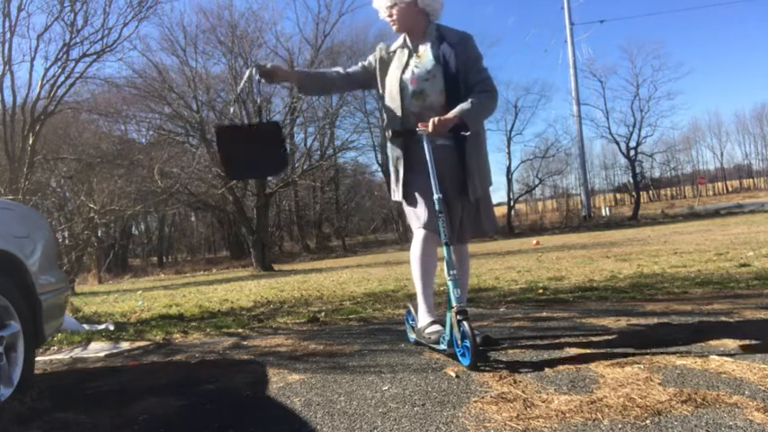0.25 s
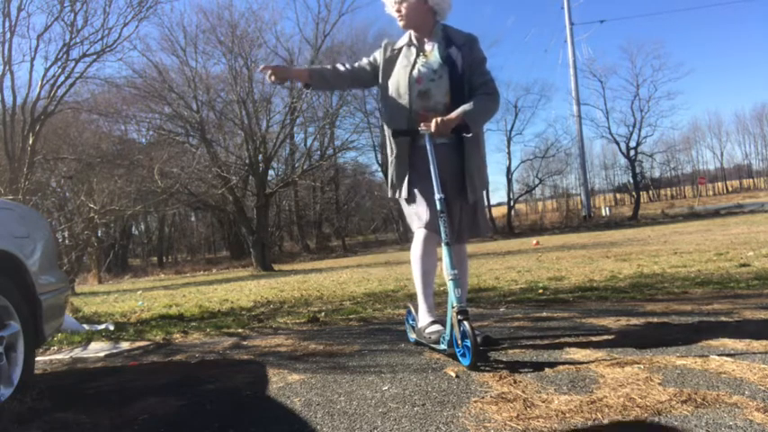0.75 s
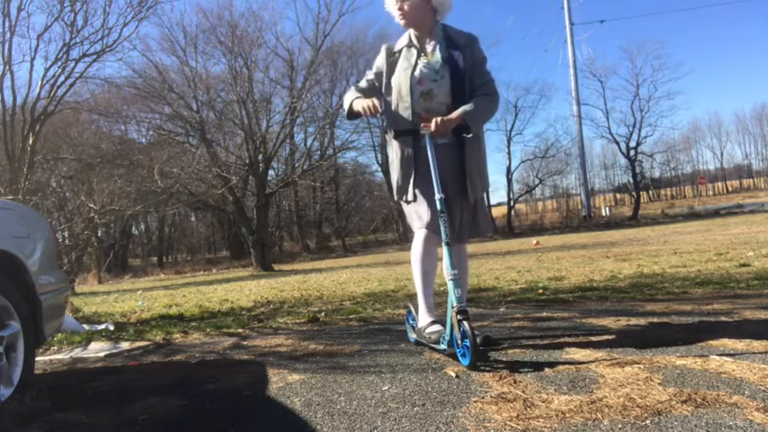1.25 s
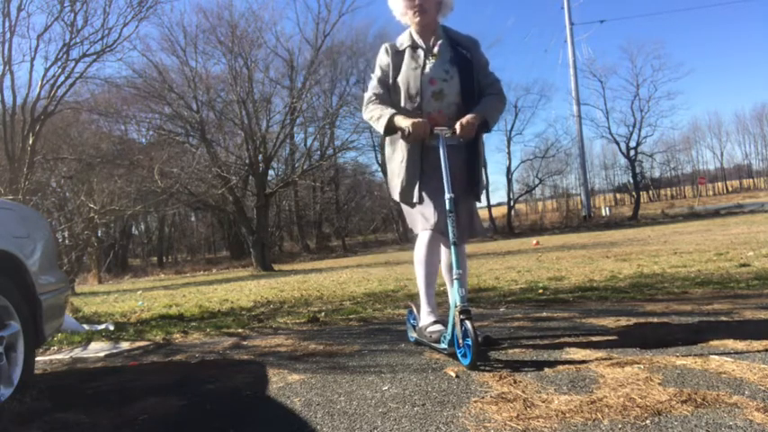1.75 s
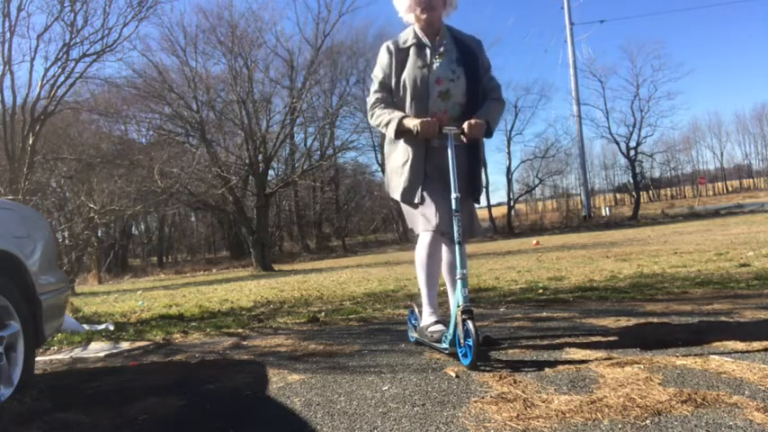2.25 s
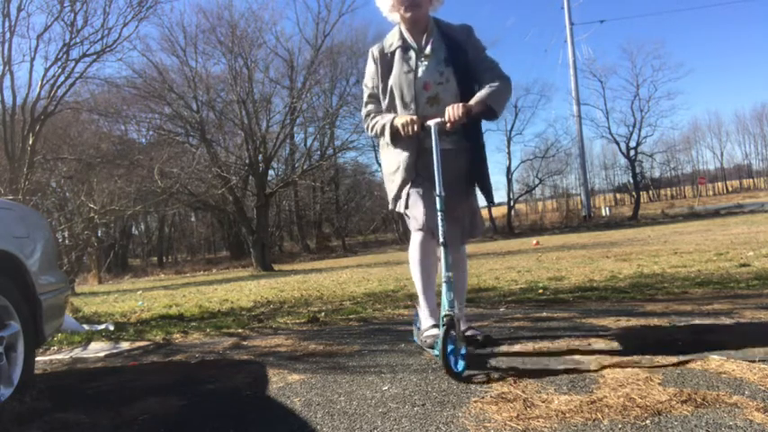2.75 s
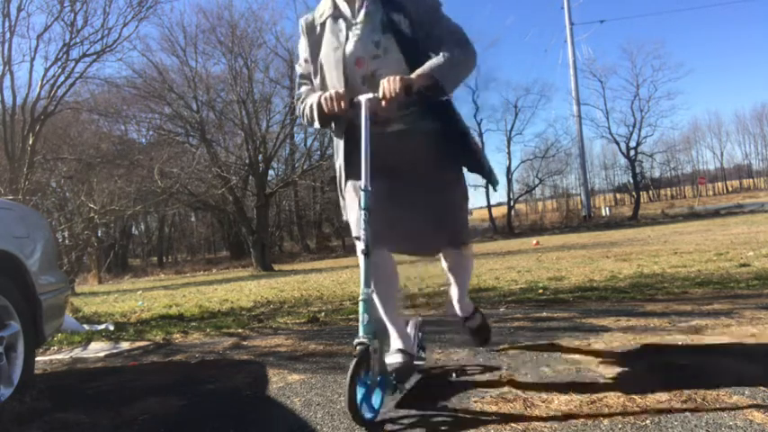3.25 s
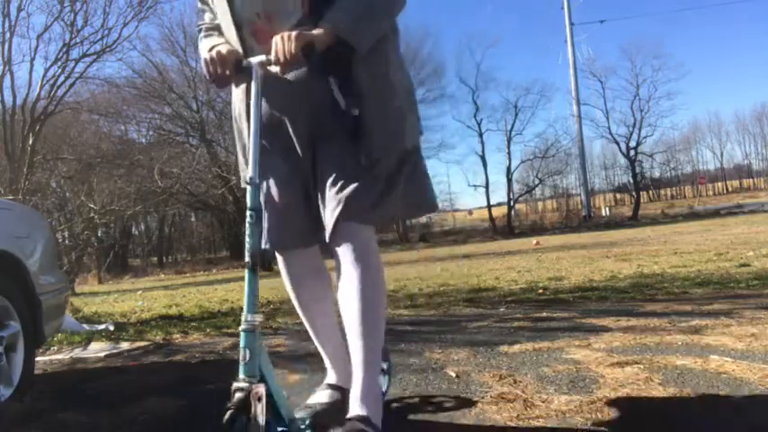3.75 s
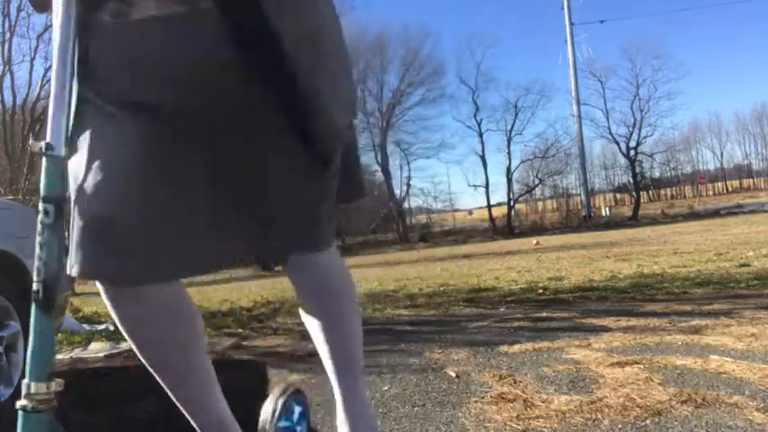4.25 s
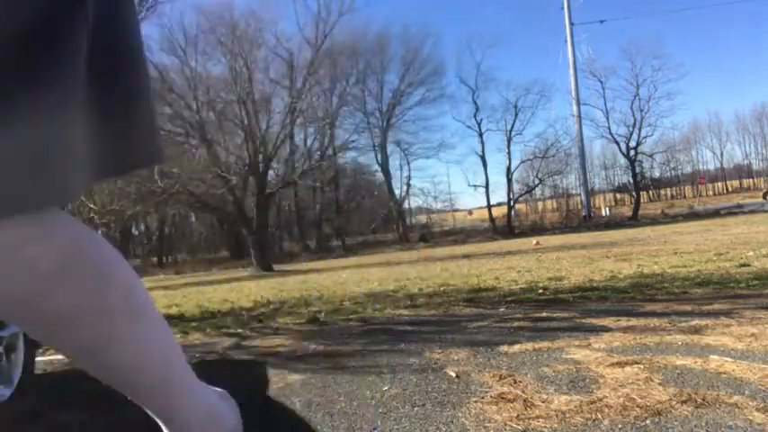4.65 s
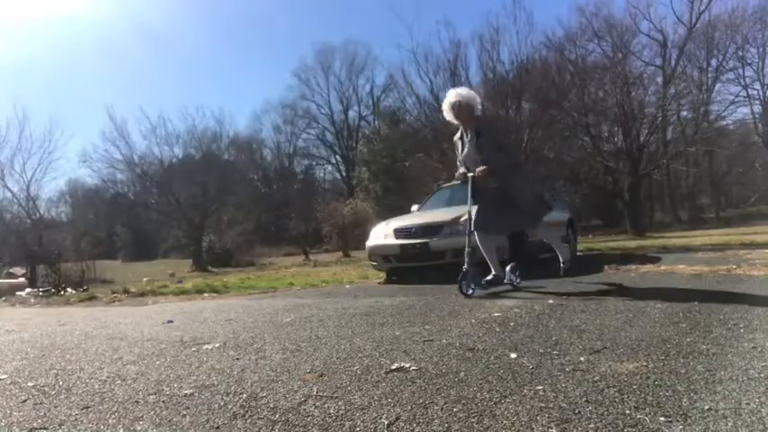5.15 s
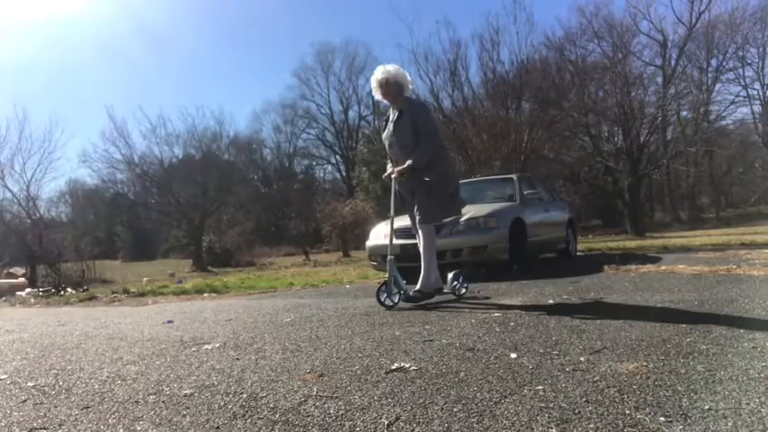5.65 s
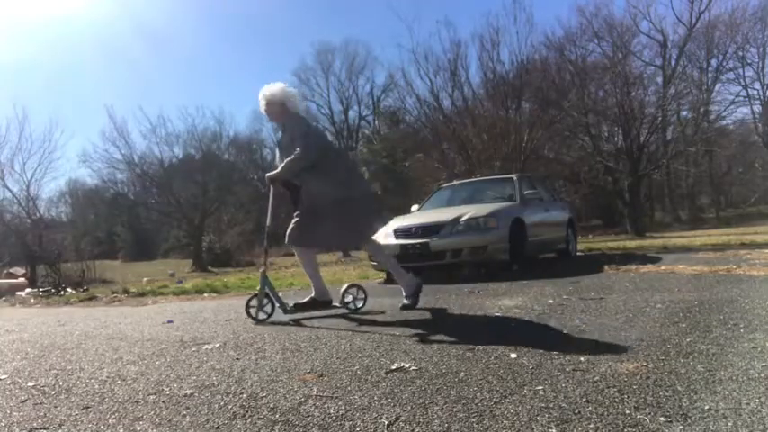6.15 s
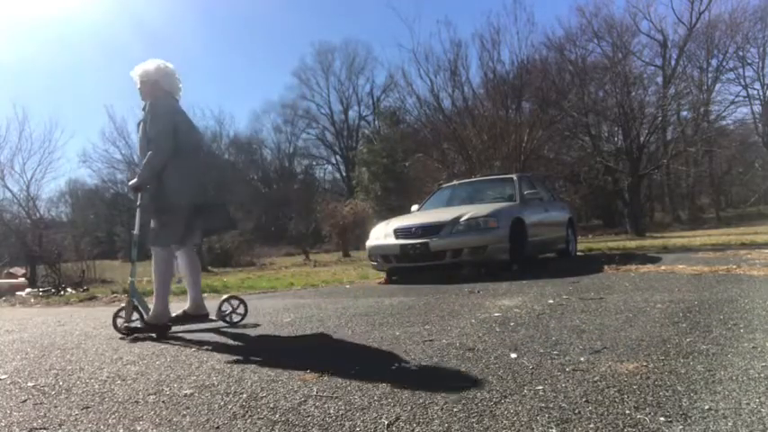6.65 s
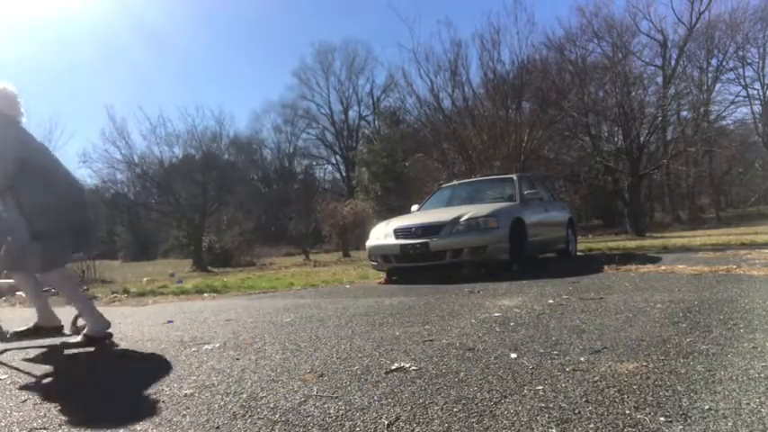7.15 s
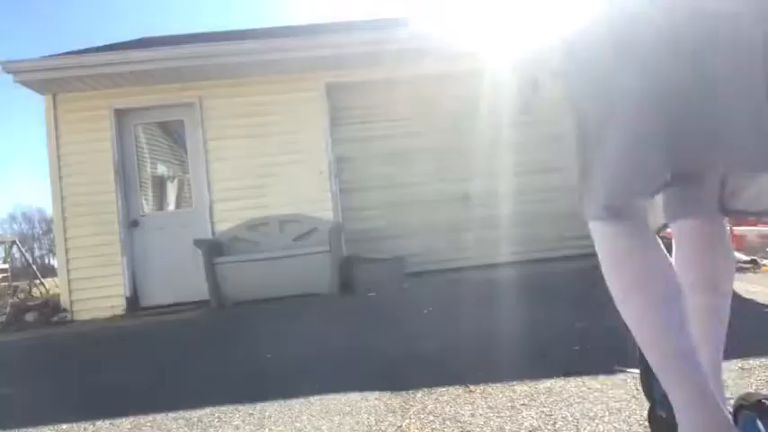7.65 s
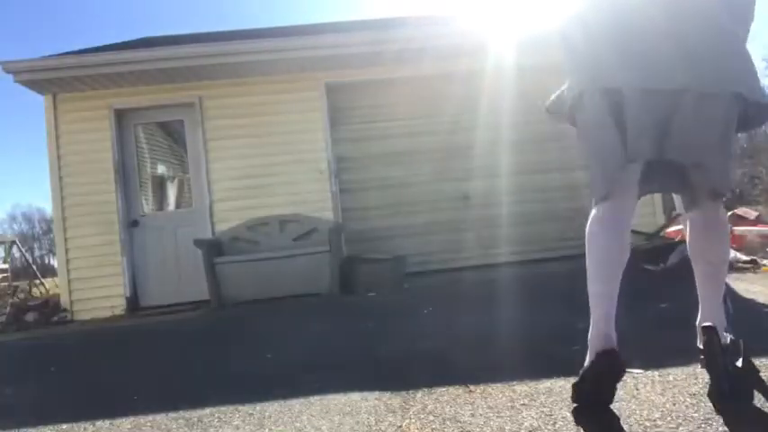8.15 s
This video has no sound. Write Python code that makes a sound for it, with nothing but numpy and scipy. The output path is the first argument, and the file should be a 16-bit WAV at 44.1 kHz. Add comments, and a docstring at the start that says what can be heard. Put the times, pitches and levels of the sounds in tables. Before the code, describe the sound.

A quiet open place with low distant rumble and slight microphone hiss. A soft double thump comes first, then small hard wheels drum over rough asphalt, loose metal parts jolting irregularly. The rattle swells in a close pass, drops suddenly, continues more thinly, and builds again under low wind thumps. A sharp close footstep cracks on grit, then gritty scuffing and rolling fade into gusts.

```python
"""A kick scooter rolls over rough asphalt: grit drums the wheels, jolts rattle loose metal frame parts.
Before it a bag lands twice on a drive; shoes knock, scuff and, from 7.6 s on, strike grit.
Rolling is coloured random clicks, metal is struck damped modes, soft landings are noise bursts.
Wind gusts buffet the microphone over a far rumble, both shaped noise.
The level dips briefly twice; from the first dip on it stays 3 dB lower."""
import sys
import numpy as np
from scipy import signal
from scipy.fft import rfft, irfft
from scipy.io import wavfile
from scipy.ndimage import uniform_filter1d

SR = 44100
rng = np.random.default_rng(int(sys.argv[2]) if len(sys.argv) > 2 else 0)


def transcribe(u):
    """Save the signal u as a 16-bit wav file named by the first command-line argument.

    u: samples, shape (n,) or (channels, n), limited to [-1, 1]; the rate is SR.
    q: integer samples, one column per channel.
    """
    v = np.clip(np.atleast_2d(u).T, -1, 1)
    q = np.round(v * 32767).astype(np.int16)
    wavfile.write(sys.argv[1], SR, q)


N = 370881

# wheels on asphalt, before trims in rolling(): time_s, drum_db, grit_hiss_db
ROLL = [(2.55, -82, -94), (2.68, -73, -80), (3.0, -63, -77), (3.4, -75, -82), (4.03, -69.5, -80),
        (4.3, -54, -60.5), (4.45, -49.5, -65), (4.6, -97, -80), (4.83, -59.5, -74), (5.8, -66.5, -78.5),
        (5.98, -53, -60.5), (6.15, -61, -75.5), (6.9, -59.5, -75.5), (7.45, -56.5, -65.5),
        (7.61, -59, -67.5), (7.72, -40.5, -64), (7.87, -57, -67.5), (8.0, -55.5, -58), (8.18, -57.5, -72.5),
        (8.41, -54, -59.5)]
# spectra of wheel drumming and grit hiss: freq_hz, density_db (per Hz, relative)
DRUM_COLOUR = [(210, -43), (350, 8), (432, 5), (546, -6.5), (675, 2), (881, -2), (1820, 5), (2830, -12.5),
               (3170, -7.5), (5000, -19.5), (6500, -11), (11000, -120)]
GRIT_COLOUR = [(2350, -7.5), (4000, 2.5), (4580, -7.5), (6860, -6), (10300, -16), (11500, -8), (15100, -11),
               (16000, -8), (16500, -29)]
HUM_DB = -17   # metal hum against the drumming

# jolts of the frame; from 7.6 s on, shoes striking grit, with hardly any metal ring:
# start_s, level_db, stem_over_deck_db, crack_over_level_db
JOLTS = [(2.6225, -46, 7, -5), (2.6668, -44, -2, -17), (2.6957, -31.5, 8, -19), (2.7584, -44, 17, -27),
         (2.7793, -38, 1, -19), (2.808, -38, 8, -22), (2.9404, -46, -3, -14), (2.9703, -44.5, 4, -4.5),
         (2.9987, -33.5, 13, -18), (3.035, -40.5, -9, -20), (3.1021, -35, 8.5, 8.5),
         (3.1596, -34, 10.5, -32), (3.207, -40, 8, -28), (3.3879, -37.5, 10, -40), (3.4874, -47, -14, -12),
         (3.5257, -45, 5.5, -40), (3.5749, -41.5, 7.5, -55), (3.6596, -37, 7, -49), (3.6952, -42, 6, -34),
         (3.736, -55.5, -12, 11), (3.8468, -49, 1, -3.5), (3.9544, -37, 2.5, -32), (4.0835, -40, 5.5, -41),
         (4.1835, -43.5, -2, -33), (4.2355, -42, 6, -27), (4.261, -37.5, 5, -9), (4.2804, -36.5, -16, -6),
         (4.3109, -32.5, 3, -10.5), (4.338, -29.5, 6, -35), (4.3733, -35, 2, -50), (4.4147, -34, -19, -32),
         (4.437, -31, -2, -46), (4.4606, -35.5, 1, -13), (4.496, -31.5, 5, -36), (4.5332, -23, 11.5, -36),
         (4.5567, -27.5, -20, -15), (4.573, -32.5, 14, -41), (4.6052, -25, 7, -29), (4.743, -54, 10, -3),
         (4.7754, -54, 6, 0), (4.8666, -41.5, 22, -28), (4.9491, -43, -3, -5), (4.9965, -33.5, 8, -15),
         (5.0187, -36.5, -6, -16), (5.044, -37.5, 9, -24), (5.0914, -51.5, -2, 3), (5.1072, -41, 13, -11),
         (5.2504, -50, 15, -3), (5.2845, -42.5, 8, -20), (5.3113, -42.5, -15, -15), (5.346, -35.5, 8, -17),
         (5.3829, -41.5, 2, -5.5), (5.576, -36.5, 4.5, -14.5), (5.6119, -38, -2.5, -28),
         (5.6524, -33.5, -2.5, -24), (5.7012, -31, 9, -16), (5.7325, -30.5, 11.5, -16),
         (5.763, -37.5, 3.5, -31), (5.8678, -41.5, -19, -27), (5.8833, -46, 10, -3), (5.902, -35, 3, -15),
         (5.923, -31, 7, -27), (5.9429, -31, 7, -21), (5.9762, -37, 6, -16), (5.9983, -34.5, 5, -23),
         (6.0226, -42.5, -1, -21), (6.099, -37, -32, -33), (6.1392, -40.5, -0.5, -25),
         (6.2077, -37, 2, -26), (6.2537, -39.5, 8, -22), (6.2812, -41, 1, -23), (6.345, -54, 3, -20),
         (6.377, -44, 8, -19), (6.4018, -43, -1, -15), (6.4286, -41, 2, -18), (6.5469, -31, 7, -22),
         (6.5817, -37.5, 2, -14), (6.6086, -32.5, 10, -13), (6.656, -40, 12, -26), (6.717, -47.5, 4, -24),
         (6.7438, -49, 0, -22), (6.8111, -33.5, 14, -32), (6.8498, -37, 11, -22), (6.874, -37.5, 25, -27),
         (6.8934, -42, 23, -21), (6.998, -40, -5, -26), (7.027, -30, 5, -6.5), (7.0644, -30, -10, -22),
         (7.102, -34.5, -24, -22), (7.148, -38.5, 2, -20), (7.2602, -35.5, -27, -19),
         (7.303, -32.5, 19, -26), (7.3623, -32.5, 18, -27), (7.395, -35.5, 9, -7), (7.4287, -30, 9, -20),
         (7.459, -28.5, 9, -35), (7.5117, -29, 27, -30), (7.5948, -36, 23, -20), (7.681, -38, -8, -22),
         (7.69, -30, 1, -8), (7.7002, -11, 2, -15), (7.762, -20.5, 23, -16), (7.7891, -25.5, 23, -19),
         (7.837, -36, -4, -24), (7.863, -34, 1.5, -11), (7.9196, -35.5, -25, -14), (7.9454, -35, -16, -1.5),
         (7.965, -29, -6, -10), (8.0195, -36.5, -4, -3), (8.0412, -43, 2, 3.5), (8.099, -49.5, 3, 8),
         (8.149, -39, -29, -27), (8.22, -39, 2, -13), (8.2445, -32.5, -15.5, -16), (8.32, -47, 6, 3),
         (8.3706, -32.5, -30, -16)]
# modes of each frame part: freq_hz, level_db (relative), t60_s
DECK_MODES = [(1156, -2, 0.014), (1380, -25, 0.0044), (1680, -7, 0.022), (1784, 1.5, 0.02),
              (2134, 1.5, 0.045), (2400, 9, 0.0083)]
STEM_MODES = [(2900, -10, .015), (3135, -2, .027), (3510, -9, .02), (3890, -4, .022), (4300, -12, .015)]
SMALL_PART_MODES = [(5450, -8, .012), (5930, -3, .018), (7350, -5, .014), (8010, -7, .012)]
CRACK_MODES = [(9250, -6, .008), (11650, -3, .008)]
PIN_MODES = [(6740, 0, .045)]
PIN_OVERTONE_MODES = [(12150, -21, .025)]
MODE_SPREAD_DB, PART_SPREAD_DB = 3.2, 3   # unevenness over modes; over small parts and pin
SMALL_PARTS_DB, SMALL_PARTS_FOLLOW_CRACK = -1.5, 0.36   # against the mean of stem and jolt level
PIN_DB, PIN_LOOSE_DB = -22, 28   # against the jolt; added while the pin chatters harder
PIN_LOOSE_FROM_S, PIN_LOOSE_TO_S = 6.12, 6.76
FAINT_JOLTS_PER_S, FAINT_JOLT_DB = 17, 12   # random small jolts; highest level over ROLL drum_db
DULL_FROM_S, DULL_RING_DB = 7.6, -14   # shoes on grit: ring held down

THRUM_FROM_S, THRUM_LENGTH_S, THRUM_DB, THRUM_HZ, THRUM_T60_S = 4.12, 0.57, -53.5, 89, 0.12

# grit cracking under wheel or sole, before trims in snaps(): start_s, level_db, body_3_8khz_db (relative)
SNAPS = [(2.9614, -52, -1), (3.0514, -51, 12), (3.113, -40.5, 10), (3.2545, -50, -17), (3.3774, -70, 17),
         (3.746, -37.5, -1), (4.1038, -47, 0), (4.1374, -45, 4), (4.156, -39, -13), (4.299, -37, 4.5),
         (4.8179, -43, -9), (6.156, -33, -11), (6.175, -41, -4), (6.3879, -36, -11), (6.468, -42, 1),
         (6.478, -44, -1), (7.1686, -33, -7), (7.255, -32.5, -13), (7.378, -31, -13), (7.409, -29, -6),
         (7.4654, -28.5, -15), (7.713, -17, 2), (7.9114, -35, -16), (7.985, -27, -16), (8.081, -37, -18.5),
         (8.1728, -38, -10), (8.194, -39, -4), (8.3399, -35, -11), (8.3764, -44, -5)]
# short knocks: bag thud, shoe and heel taps, sharp cracks of the rattling frame:
# start_s, peak_db (before the band-pass), pitch_hz, t60_s
KNOCKS = [(.8345, -32, 630, 0.016), (.857, -36, 110, 0.047), (2.696, -33, 6650, 0.0097),
          (4.4165, -29, 1370, 0.011), (1.0585, -37, 1600, 0.012), (3.0997, -18.5, 7600, 0.0055),
          (3.0983, -33, 10500, 0.0034), (3.369, -42.5, 1250, 0.033), (4.5565, -25, 2100, 0.0057),
          (5.6829, -20, 770, 0.0068), (7.7008, -4, 1660, 0.0037), (7.7647, -11.5, 5260, 0.002),
          (7.748, -21, 1160, .012)]
# bag, shoes, cloth; nominal values, scaled in slaps():
# start_s, level_db, length_s, low_edge_hz, high_edge_hz, bright_edge_db (over the body)
SLAPS = [(.832, -29.5, 0.017, 340, 830, -24), (.833, -40.5, 0.045, 1220, 2640, -36),
         (0.836, -29.5, 0.071, 59.4, 250, -22.5), (0.99, -57.5, 0.033, 400, 2940, -30),
         (1.058, -31.5, 0.081, 272, 970, -45), (1.0554, -34, 0.057, 1030, 2270, -23.5),
         (1.482, -68, .06, 3000, 15000, -30), (1.62, -66.5, 0.25, 3000, 15000, -30),
         (3.751, -41, 0.032, 665, 1940, -28), (2.998, -52, 0.15, 2180, 4700, -27),
         (5.867, -47.5, 0.32, 990, 3870, -15), (7.04, -38, 0.21, 930, 3600, -16.5),
         (7.702, -20.5, 0.038, 200, 567, -30), (7.705, -26, 0.069, 780, 7000, 0)]
SLAP_GRAIN_DB, SLAP_GRAIN_HZ = 3.5, 160   # grit under what lands breaks the burst up

# gusts on the microphone; at 4.256 s low wheel rumble as the scooter passes close:
# peak_start_s (full strength reached), peak_db, hold_s, flutter_over_swing_db
GUSTS = [(.15, -53.5, 0.083, -30), (.6, -55.5, 0.6, -32), (4.256, -59, 0.32, 4.5), (4.94, -51, .02, -12),
         (5.086, -48.5, 0.025, -20), (5.48, -54, .03, -20), (6.573, -35, 0.0074, -16.5),
         (6.634, -34.5, 0.0079, -11.5), (6.697, -42, 0.034, -26), (6.882, -36, 0.031, -30),
         (6.978, -41.5, 0.27, -12.5), (7.275, -31.5, 0.0083, -22), (7.314, -30, 0.0091, -21),
         (7.357, -30.5, .01, -22), (7.427, -38, .04, -15), (7.507, -29, 0.016, -20.5),
         (7.915, -40.5, 0.018, -11), (7.973, -34, 0.0089, -7.5), (8.02, -33, 0.0091, -15),
         (8.124, -36.5, 0.043, -10), (8.216, -37, .01, -8.5), (8.291, -27, 0.014, -17),
         (8.337, -32.5, 0.0081, -18), (8.392, -35, 0.023, -7.5)]
# spectrum of the slow swings: freq_hz, density_db (per Hz, relative)
WIND_COLOUR = [(15, -33), (25, -7), (40, -3), (59, 2.5), (115, -6), (170, -13), (220, -27), (370, -120)]
GUST_RISE_DB_PER_S, GUST_FALL_DB_PER_S = 406, 357
# light air between the gusts
BREEZE_FROM_S, BREEZE_DB, BREEZE_SWAY_DB, BREEZE_FLUTTER_DB = 4.7, -60, 3, -15.5

# far rumble of the open country, before the trim in far(): time_s, level_db, wash_above_600hz_db
FAR = [(0.0, -57, 5), (1.0, -52, 2), (1.9, -54, 0), (4.05, -55.5, -2.5), (4.6, -54.5, 7),
       (4.75, -70.5, 8.5), (6.1, -58.5, 3), (7.0, -68.5, 2.5), (7.6, -54, 4.5), (8.41, -51.5, 2.5)]
# spectrum of the far rumble: freq_hz, density_db (per Hz, relative)
FAR_COLOUR = [(15, -34), (25, 7.5), (65, -1.5), (130, -3), (184, -3.5), (265, -1.5), (319, -8.5),
              (854, -17.5), (1070, -17.5), (1320, -19.5), (2510, -31.5), (6000, -53), (7800, -71),
              (13200, -120)]

# spectrum of the microphone's own hiss: freq_hz, density_db (per Hz, relative)
SELF_NOISE_COLOUR = [(1180, -14), (2000, -5), (5010, -10.5), (5720, -8), (10500, -18), (14600, -15.5),
                     (16500, -31)]
SELF_NOISE_DB = -74
# brief level dips: bottom_s, depth_db (from the level before), fade_out_s, fade_in_s, gain_after_db
DIPS = [(4.655, -22.5, 0.038, 0.034, -3), (7.587, -26, 0.021, 0.0097, -3)]
LOW_CUT_HZ, HIGH_CUT_HZ = 34.0, 16700


def from_db(db):
    """Gain of a level in dB."""
    return 10 ** (np.asarray(db) / 20)


def rms_one(x):
    """Scale to rms 1."""
    return x / np.sqrt(np.mean(x ** 2) + 1e-20)


def in_time(rows, before_db=None):
    """Interpolate each column of a time table, sample by sample."""
    time_s, *columns = np.transpose(rows)
    return [np.interp(np.arange(N) / SR, time_s, c, left=before_db) for c in columns]


def coloured(x, spectrum):
    """Give a white signal a spectrum; rms 1."""
    hz, db = np.transpose(spectrum)
    grid_hz = np.arange(1, N // 2 + 2) * SR / N
    gain_db = np.interp(np.log(grid_hz), np.log(hz), db, left=-90, right=-90)
    return rms_one(irfft(rfft(x) * from_db(gain_db), N))


def band(x, low_hz, high_hz):
    """Band-pass, upper edge kept below Nyquist."""
    edges_hz = [low_hz, min(high_hz, .45 * SR)]
    return signal.sosfilt(signal.butter(2, edges_hz, "band", fs=SR, output="sos"), x)


def drift(rate_hz):
    """Noise low-passed by two equal poles: slow chance with rms 1."""
    r = np.exp(-2 * np.pi * rate_hz / SR)
    white = rng.standard_normal(N + SR)
    return rms_one(signal.lfilter([1], [1, -2 * r, r * r], white)[SR:])   # first second is run-in


def evened(x, span_s):
    """Hold the level near rms 1 over spans of the given length."""
    power = uniform_filter1d(x ** 2, max(round(span_s * SR), 1))
    return x / np.sqrt(power + 0.019 * np.mean(x ** 2))


def patchy(x, edges_hz, depth_db, rate_hz):
    """Each band swells and sinks on its own."""
    out = np.zeros(N)
    for k, (low_hz, high_hz) in enumerate(zip(edges_hz, edges_hz[1:])):
        sign = (-1) ** k
        out += sign * band(x, low_hz, high_hz) * from_db(depth_db * drift(rate_hz))
    return out


def ring(x, hz, t60_s):
    """Damped resonance: a unit click starts a sine of height 1."""
    r, w = from_db(-60 / (t60_s * SR)), 2 * np.pi * hz / SR
    return signal.lfilter([0, np.sin(w)], [1, -2 * r * np.cos(w), r * r], x + 1e-18)


def dying(clicks, t60_s):
    """Each click starts an exponentially dying envelope."""
    return signal.lfilter([1], [1, -from_db(-60 / (t60_s * SR))], clicks + 1e-18)


def grit(per_s, spread_db):
    """Stones under a wheel: random clicks of uneven size on a bed of fine grain."""
    sizes = from_db(spread_db * np.minimum(rng.exponential(1, N), 5)) * rng.choice([-1, 1], N)
    clicks = sizes * (rng.random(N) < per_s / SR)
    return rms_one(clicks) + 0.61 * rng.standard_normal(N)


def rolling():
    """Grit drums wheels and deck, hisses and keeps the frame humming; the level throbs in patches."""
    drum_db, hiss_db = in_time(ROLL, before_db=-100)
    t = np.arange(N) / SR
    drum = coloured(grit(per_s=700.0, spread_db=2.0), DRUM_COLOUR)
    drum = patchy(drum, [250, 900, 1400, 2000, 3000, 6500], depth_db=5.5, rate_hz=25.0)
    hiss = coloured(grit(per_s=1100.0, spread_db=-0.5), GRIT_COLOUR)
    hiss = hiss * from_db(2.95 * drift(19.0))

    shaking = grit(per_s=150.0, spread_db=7.0)
    hum = np.zeros(N)
    for hz, level_db, t60_s in DECK_MODES[3:] + STEM_MODES:
        hum += from_db(level_db) * rms_one(ring(shaking, hz, t60_s))
    pin_hz, _, pin_t60_s = PIN_MODES[0]
    hum += from_db(pin_db(t) - 14) * rms_one(ring(shaking, pin_hz, pin_t60_s))
    hum *= from_db(HUM_DB + DULL_RING_DB * (t > DULL_FROM_S))

    throb = from_db(1.5 * drift(30.0))
    return throb * ((drum + hum) * from_db(drum_db - 1.5) + hiss * from_db(hiss_db + 4.0))


def pin_db(s):
    """Level of the loose pin against the jolt; raised while it chatters harder."""
    return PIN_DB + PIN_LOOSE_DB * ((s > PIN_LOOSE_FROM_S) & (s < PIN_LOOSE_TO_S))


def blows_by_part():
    """Times of listed and random blows; the level in dB for deck, stem, small parts, pin and crack."""
    first_s = ROLL[0][0]
    span_s = N / SR - first_s
    luck = rng.random((round(FAINT_JOLTS_PER_S * span_s), 4))
    faint_s = first_s + luck[:, 0] * (span_s - .06)
    drum_db = np.interp(faint_s, *np.transpose(ROLL)[:2])
    faint_db = drum_db + FAINT_JOLT_DB - 8 * luck[:, 1]
    faint = [faint_s, faint_db, 30 * (luck[:, 2] - .5), -10 - 25 * luck[:, 3]]
    s, level_db, lean_db, crack_db = np.hstack([np.transpose(JOLTS), faint])

    spread_db = PART_SPREAD_DB * rng.standard_normal((len(s), 2))
    deck_db = level_db - np.maximum(lean_db, 0)
    stem_db = level_db + np.minimum(lean_db, 0)
    small_db = (stem_db + level_db) / 2 + SMALL_PARTS_DB
    small_db = small_db + SMALL_PARTS_FOLLOW_CRACK * crack_db + spread_db[:, 0]
    loose_db = level_db + pin_db(s) + spread_db[:, 1]
    return s, [deck_db, stem_db, small_db, loose_db, level_db + crack_db]


def rattle():
    """Each blow chatters in the parts' modes with a noise splash; late shoe strikes are mostly splash."""
    s, blows_db = blows_by_part()
    at, out = np.round(s * SR).astype(int), np.zeros(N)
    luck = rng.standard_normal((len(at), 27))   # one column per mode; the last four jitter the gaps
    blows_db = blows_db + [blows_db[3]]   # the pin's overtone shares its blow
    # modes, ring_db, splash_db, low_hz, high_hz, splash_t60_s
    parts = [(DECK_MODES, -9.1, 6.1, 900, 2600, .04),
             (STEM_MODES, -8.1, 1.1, 2600, 4600, .03),
             (SMALL_PART_MODES, -10.1, 3.1, 4600, 8800, .025),
             (PIN_MODES, -3.1, -14.1, 6400, 7100, .025),
             (CRACK_MODES, -12.1, 1.9, 8800, 17000, .025),
             (PIN_OVERTONE_MODES, -3, -30, 11000, 13500, .02)]
    touches = [(0, 0.44), (.0015, 0.86), (.005, .5), (.019, 0.23)]   # contact, rebounds: gap_s, share
    dull_db = DULL_RING_DB * (s > DULL_FROM_S)
    mode = 0
    for blow_db, (modes, ring_db, splash_db, low_hz, high_hz, splash_t60_s) in zip(blows_db, parts):
        clicks = np.zeros(N)
        clicks[at] = from_db(blow_db + splash_db)
        part = dying(clicks, splash_t60_s) * rng.standard_normal(N)
        for hz, level_db, t60_s in modes:
            uneven_db = MODE_SPREAD_DB * np.clip(luck[:, mode], -2, 1)
            strength = from_db(blow_db + dull_db + ring_db + level_db + uneven_db)
            clicks = np.zeros(N)
            for k, (gap_s, share) in enumerate(touches):
                gap = np.round(gap_s * SR * from_db(3.0 * luck[:, 23 + k])).astype(int)
                clicks[at + gap] += share * strength
            part += ring(clicks, hz, t60_s)
            mode += 1
        # a soft contact excites only the part's own range
        out += band(band(part, low_hz, high_hz), 1.013 * low_hz, 0.9373 * high_hz)
    return out


def thrum():
    """Rolling sets a low deck thrum going: noise into one resonance of its own, heard while it passes close."""
    phase = np.clip((np.arange(N) / SR - THRUM_FROM_S) / THRUM_LENGTH_S, 0, 1)
    swell = np.sqrt(np.sin(np.pi * phase) + 1e-12)
    return from_db(THRUM_DB) * swell * rms_one(ring(rng.standard_normal(N), THRUM_HZ, THRUM_T60_S))


def snaps():
    """Grit cracks: short dry noise bursts, a bright band plus a body band."""
    s, level_db, body_db = np.transpose(SNAPS)
    bands = [(level_db - 14.5, 9000, 17000), (level_db + body_db - 8.0, 2800, 8500)]
    out = np.zeros(N)
    for band_db, low_hz, high_hz in bands:
        clicks = np.zeros(N)
        clicks[np.round(s * SR).astype(int)] = from_db(band_db)
        out += band(dying(clicks, 0.046) * rng.standard_normal(N), low_hz, high_hz)
    return out


def knocks():
    """Thud, taps, cracks: one click into one heavily damped resonance, with little below it."""
    out = np.zeros(N)
    for s, peak_db, hz, t60_s in KNOCKS:
        click = np.zeros(round(.08 * SR))
        click[0] = from_db(peak_db)
        i = round(s * SR)
        out[i:i + len(click)] += band(ring(click, hz, t60_s), hz / 2, hz * 4.0)
    return out


def slaps():
    """Soft things land or brush: a noise burst holds briefly, then dies, with a bright edge on it."""
    out = np.zeros(N)
    grain = from_db(SLAP_GRAIN_DB * np.clip(drift(SLAP_GRAIN_HZ), -3, 1))
    t = np.arange(round(.3 * SR)) / SR
    for s, level_db, length_s, low_hz, high_hz, edge_db in SLAPS:
        white = rng.standard_normal(len(t))
        body = band(band(white, low_hz, high_hz), 0.13 * low_hz, 2.8 * high_hz)
        burst = evened(body, 0.096) + from_db(edge_db) * white
        envelope = np.exp(-(1.54 * t / length_s) ** 1.83)   # about -19 dB at length_s
        i = round(s * SR)
        out[i:i + len(t)] += from_db(level_db - 8) * burst * envelope
    return out * grain


def wind():
    """Slow swings push the microphone, sharper flutter in lumps; one swell stands for wheel rumble."""
    t = np.arange(N) / SR
    swing = from_db(BREEZE_DB + BREEZE_SWAY_DB * drift(3.8)) * (t > BREEZE_FROM_S)
    lumps = swing * from_db(BREEZE_FLUTTER_DB)
    for peak_start_s, peak_db, hold_s, flutter_db in GUSTS:
        rise_db = GUST_RISE_DB_PER_S * np.clip(peak_start_s - t, 0, 1)
        fall_db = GUST_FALL_DB_PER_S * np.clip(t - peak_start_s - hold_s, 0, 1)
        gust = from_db(peak_db - rise_db - fall_db)
        swing = np.maximum(swing, gust)
        lumps = np.maximum(lumps, gust * from_db(flutter_db))
    swings = evened(coloured(rng.standard_normal(N), WIND_COLOUR), 0.0375)
    flutter = rms_one(band(band(rng.standard_normal(N), 164, 331), 91, 580))
    flutter = flutter * from_db(2.8 * drift(34.0))
    return swing * swings + lumps * flutter


def far():
    """Far rumble: coloured noise that swells a little, with a wash of distant tyres above it."""
    level_db, wash_db = in_time(FAR)
    rumble = coloured(rng.standard_normal(N), FAR_COLOUR)
    low = signal.sosfilt(signal.butter(2, 600, fs=SR, output="sos"), rumble)
    wash = (rumble - low) * from_db(wash_db)
    return (low + wash) * from_db(level_db + 1.0 + 1.1 * drift(18.0))


def scatter(blows):
    """Blows return dull and uneven from ground and things nearby: a dying noise tail, band-passed."""
    t = np.arange(round(.09 * SR)) / SR
    tail = rng.standard_normal(len(t)) * from_db(-60 * t / 0.12) * (t > .003)
    echo = from_db(-33.5) * signal.fftconvolve(blows, tail)[:N]
    return band(echo, 290, 7600)


def scene():
    """Sum all sources; only the blows scatter."""
    blows = rattle() + snaps() + knocks() + slaps()
    return (rolling() + blows + scatter(blows) + thrum() + wind() + far())[None]


def dips_db():
    """Gain over time: two brief dips, each ending at its gain_after_db."""
    t, out, before_db = np.arange(N) / SR, 0.0, 0
    for s, depth_db, fade_out_s, fade_in_s, after_db in DIPS:
        out = out + np.interp(t, [s - fade_out_s, s, s + fade_in_s], [0, depth_db, after_db - before_db])
        before_db = after_db
    return out + 1.0   # overall trim


def record(dry):
    """The microphone hisses and drops the deepest bass; the level dips; the top is cut."""
    hiss = from_db(SELF_NOISE_DB) * coloured(rng.standard_normal(N), SELF_NOISE_COLOUR)
    low_cut = signal.butter(4, LOW_CUT_HZ, "high", fs=SR, output="sos")
    high_cut = signal.cheby2(12, 60, HIGH_CUT_HZ, fs=SR, output="sos")
    thin = signal.sosfilt(low_cut, dry + hiss)
    return signal.sosfilt(high_cut, thin * from_db(dips_db()))


dry = scene()
out = record(dry)
transcribe(out)
```